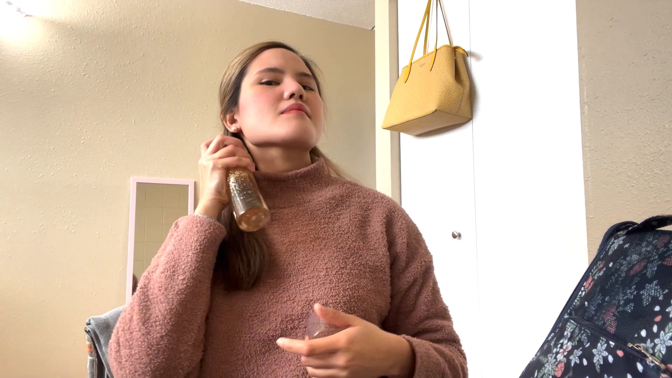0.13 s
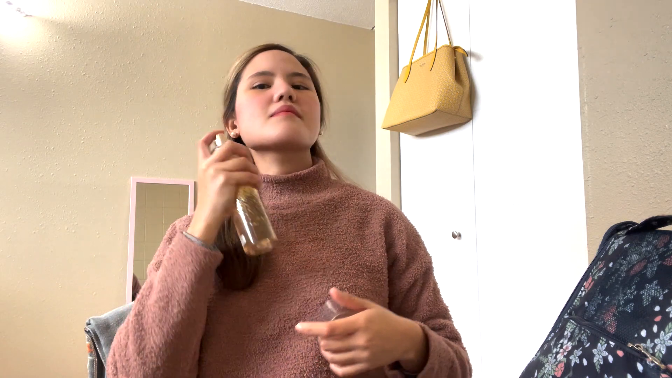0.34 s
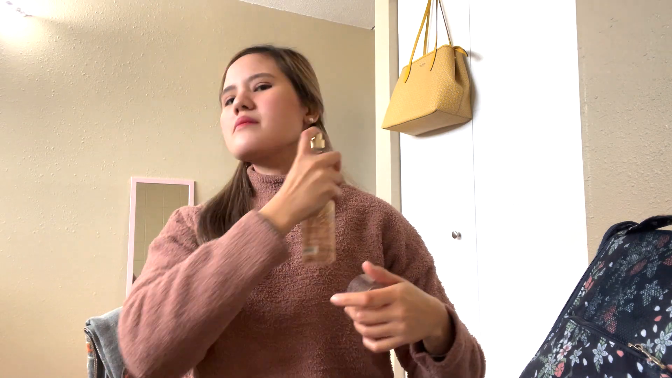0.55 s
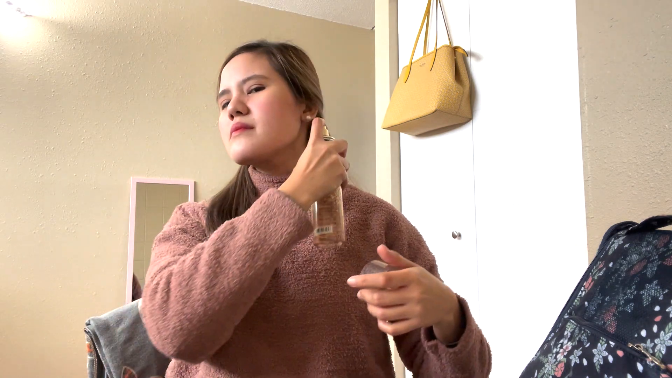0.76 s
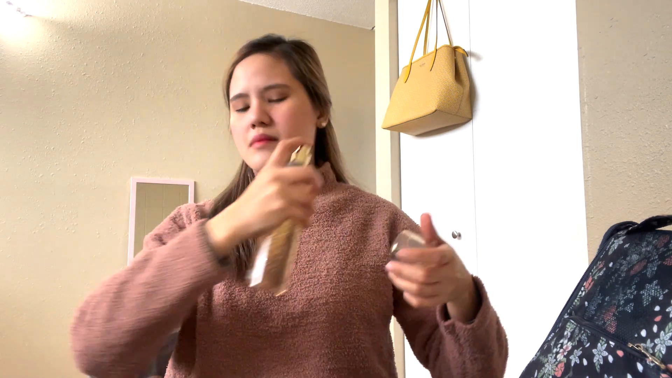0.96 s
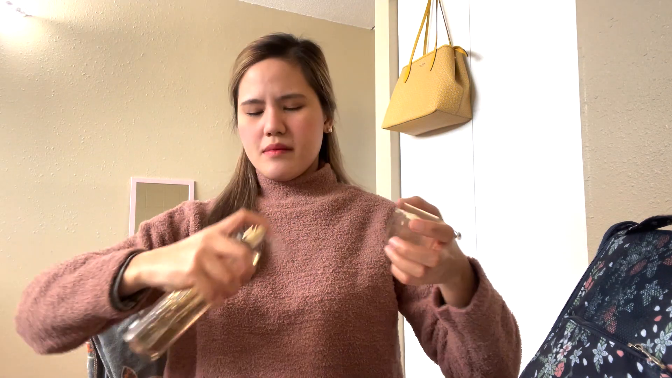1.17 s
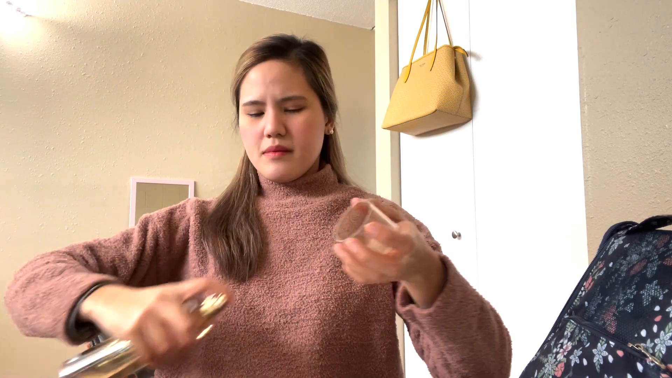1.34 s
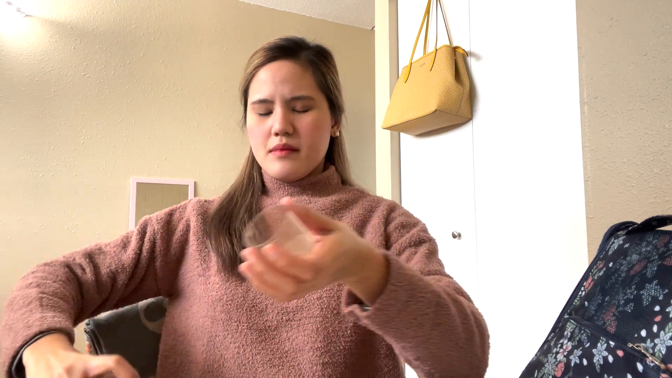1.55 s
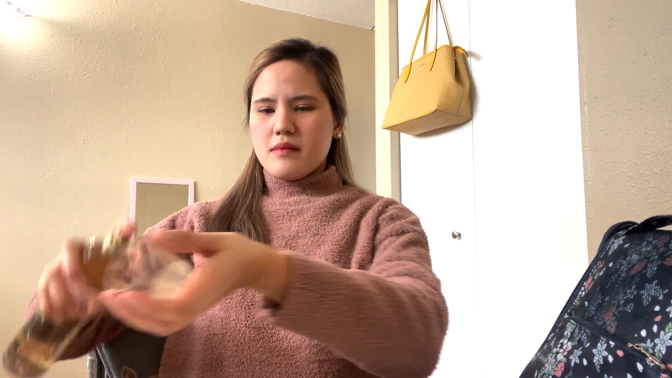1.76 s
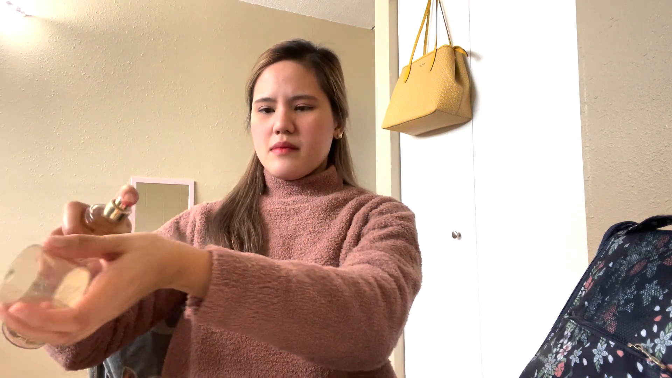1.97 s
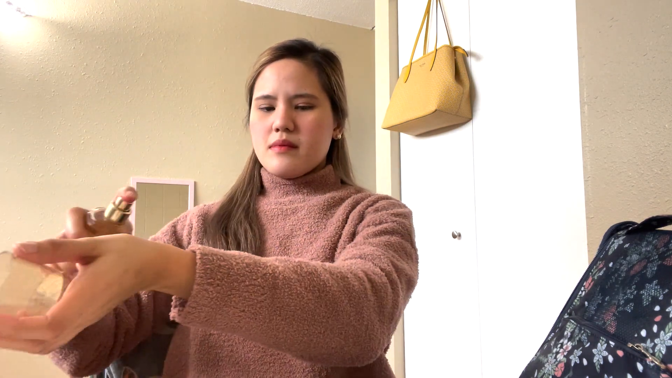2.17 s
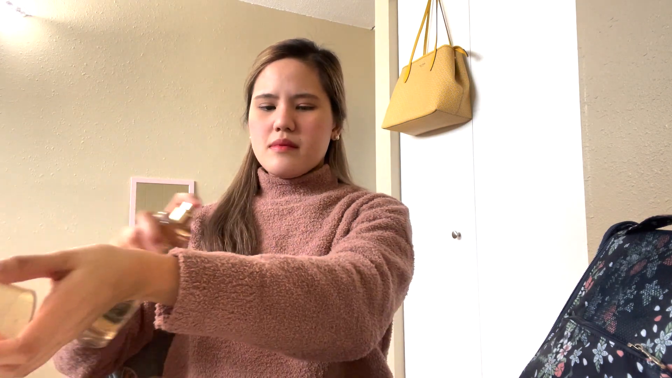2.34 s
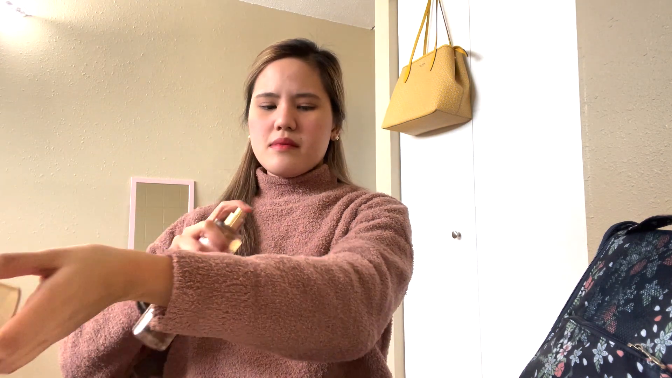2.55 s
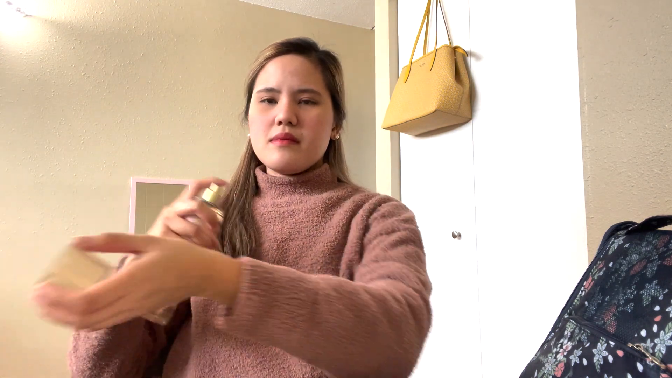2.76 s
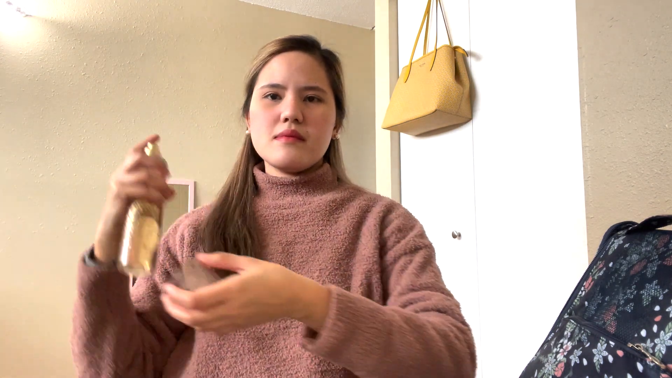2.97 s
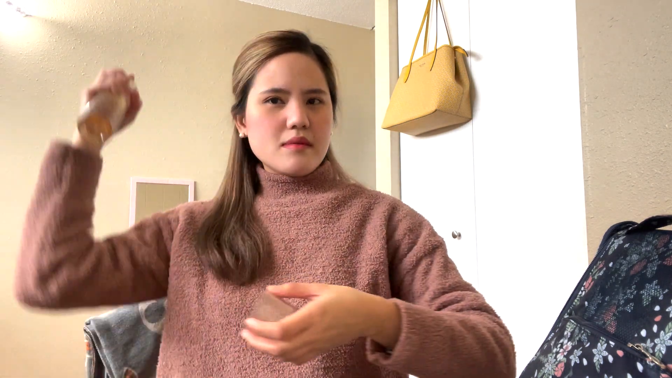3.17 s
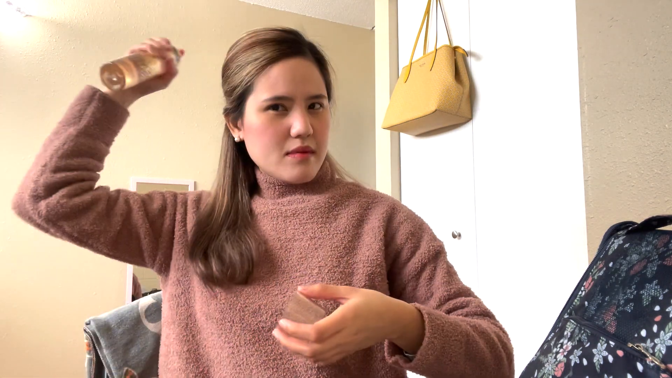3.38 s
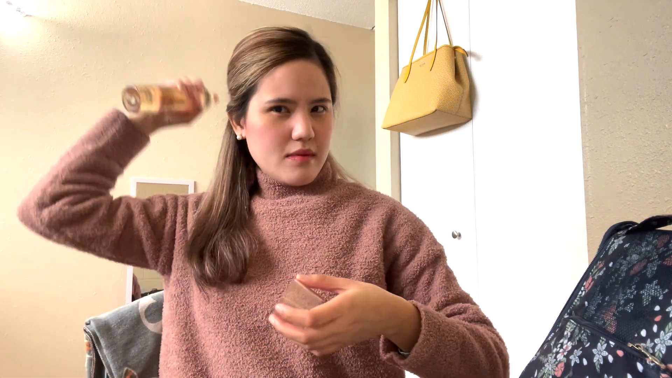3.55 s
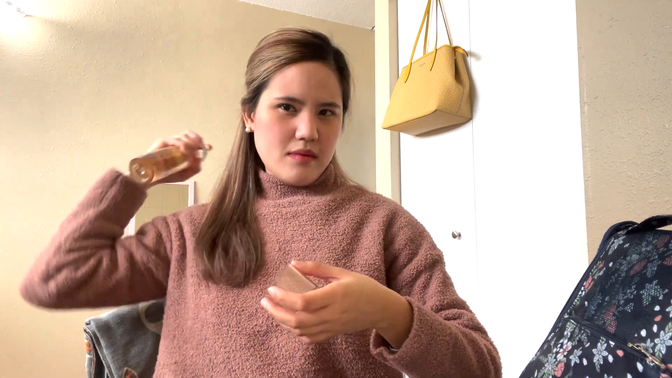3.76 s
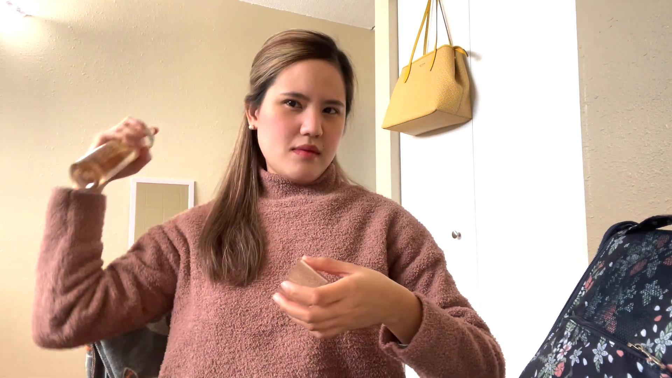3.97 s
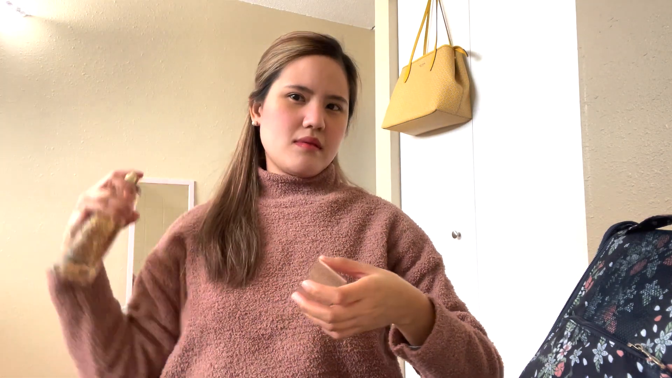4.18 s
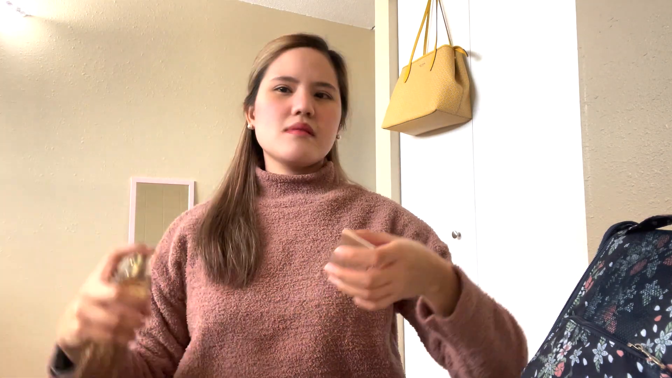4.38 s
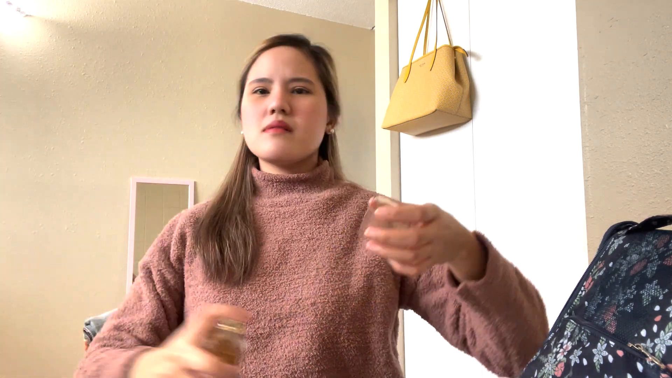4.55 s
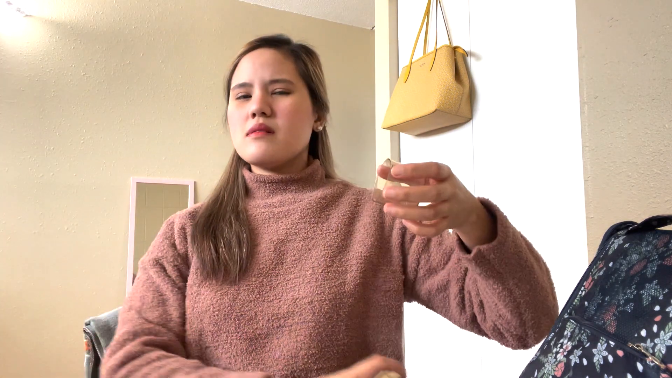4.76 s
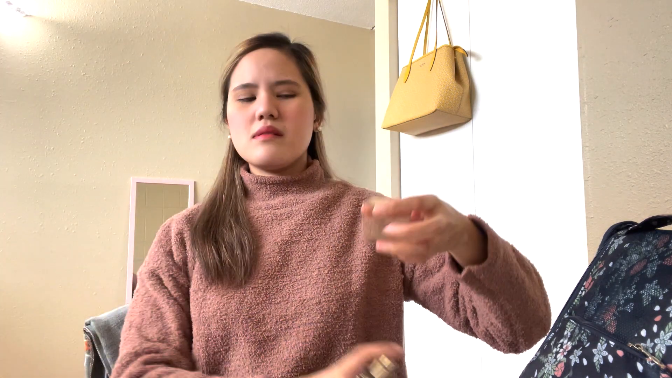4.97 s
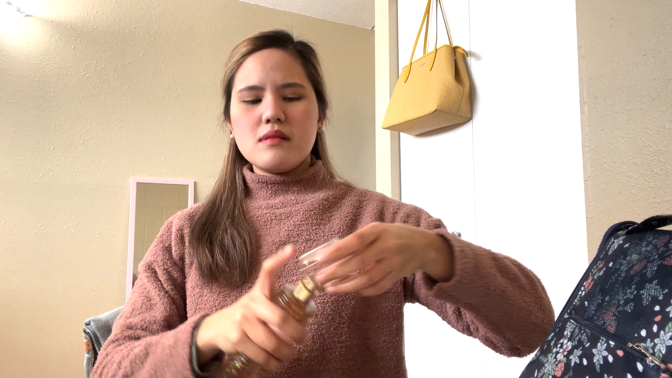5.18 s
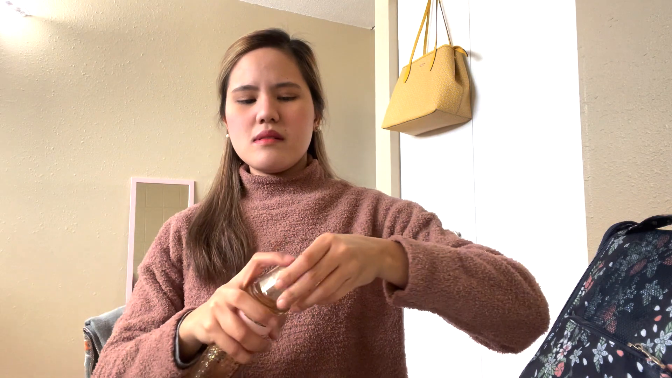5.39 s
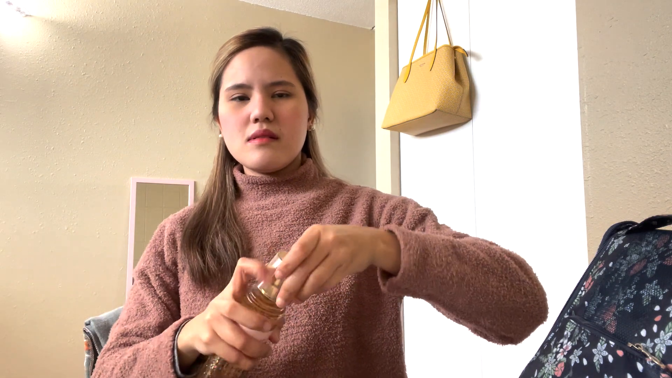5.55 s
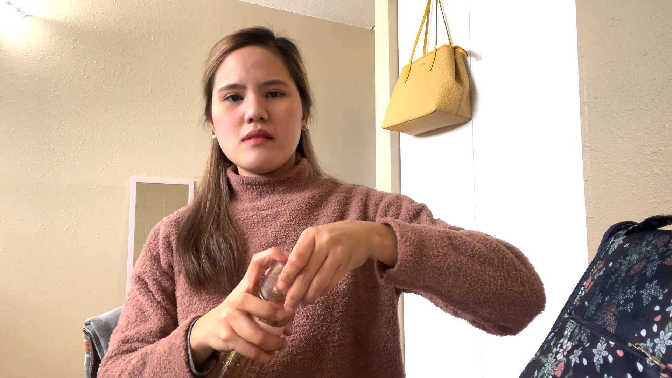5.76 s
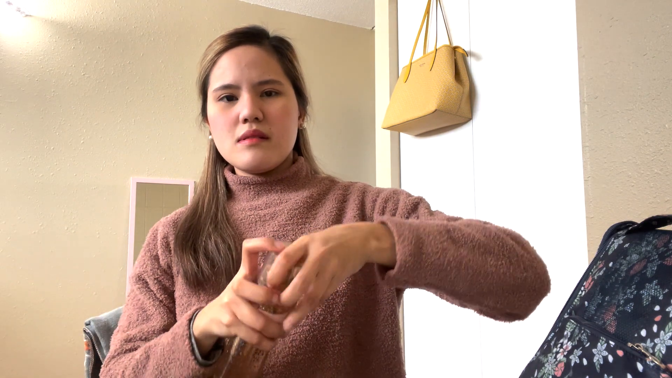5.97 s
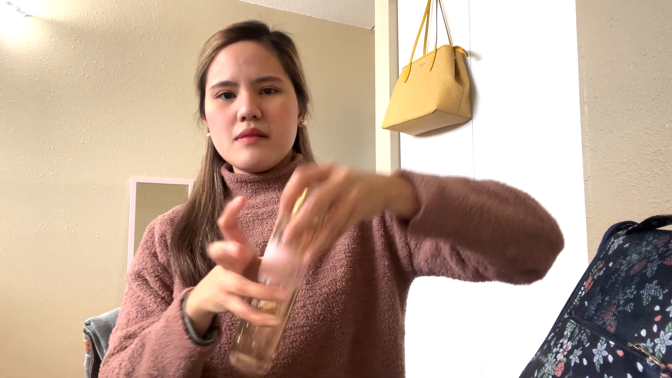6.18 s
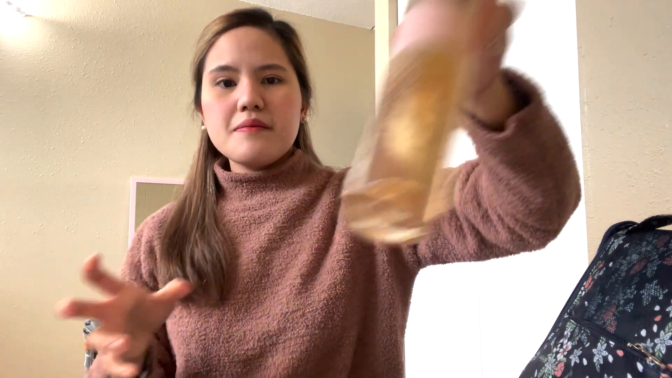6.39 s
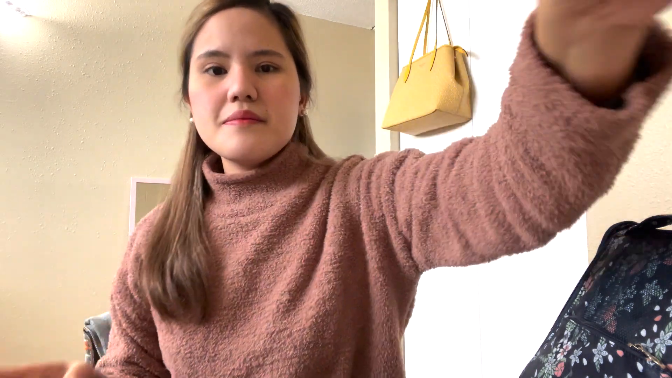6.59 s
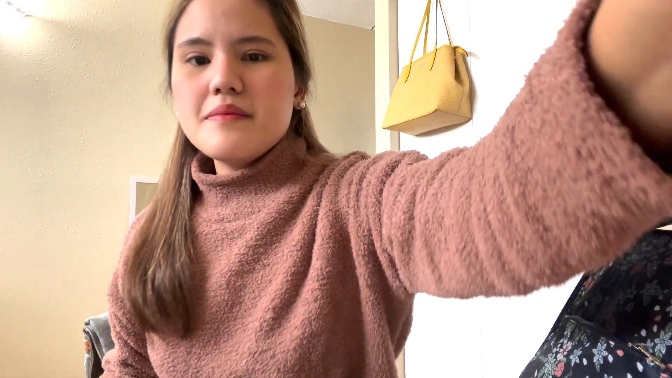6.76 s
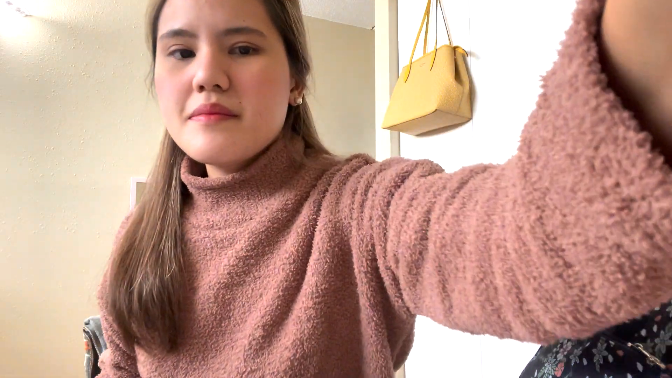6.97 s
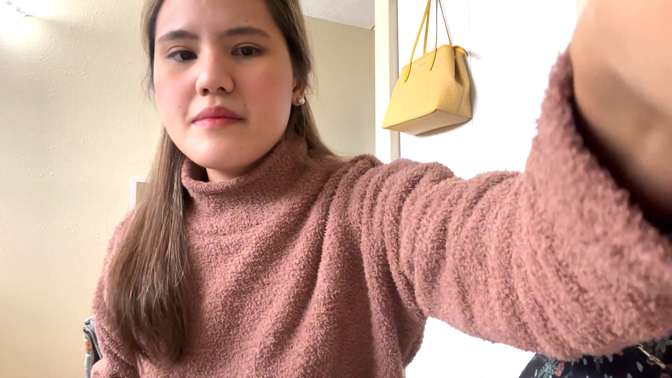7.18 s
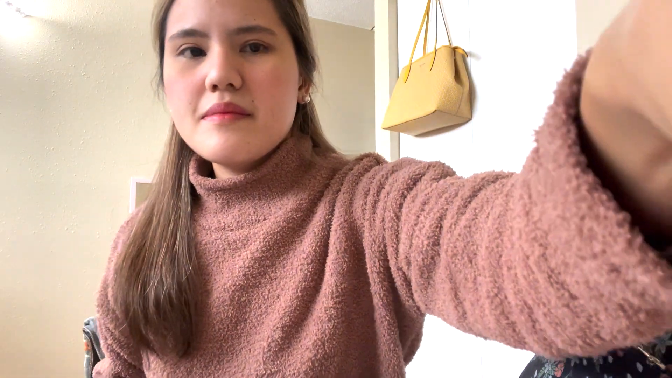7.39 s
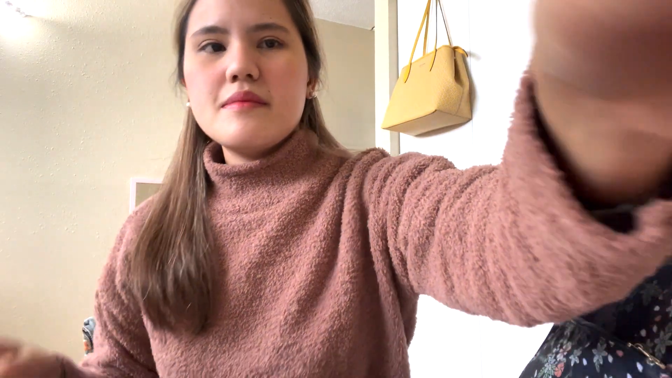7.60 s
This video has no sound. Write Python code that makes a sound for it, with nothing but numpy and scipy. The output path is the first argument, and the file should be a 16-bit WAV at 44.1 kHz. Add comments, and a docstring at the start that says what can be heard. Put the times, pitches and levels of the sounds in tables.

```python
"""A spray pump at arm's length clicks and hisses, press after press, over a low hum in a small quiet room.
Then its plastic cap is pushed on and the bottle is put down on the desk that carries the microphone.
Sprays are shaped noise with a breathy whistle; blows and clinks are decaying partials; rubs are swelling
noise. The hum is noise lifted by room resonances; two facing walls give sharp sounds a flutter echo."""
import sys
import numpy as np
from scipy import signal
from scipy.fft import rfft, irfft
from scipy.io import wavfile
from scipy.ndimage import uniform_filter1d

SR = 44100
rng = np.random.default_rng(int(sys.argv[2]) if len(sys.argv) > 2 else 0)


def store_wav(level_fs):
    """Save 16-bit WAV to argv[1]."""
    pcm = np.round(np.clip(np.atleast_2d(level_fs), -1, 1) * 32767)
    wavfile.write(sys.argv[1], SR, pcm.T.astype(np.int16))


def to_linear_factor(level_db):
    """Convert decibel levels (scalar or array-like) to linear amplitude factors."""
    exponent = np.asarray(level_db, float) / 20
    return 10 ** exponent


N = 336483


def read(points, hz):
    """A table joined by straight lines over log frequency."""
    f, value = np.transpose(points)
    return np.interp(np.log(hz + 1), np.log(f + 1), value)


def evened(x):
    """Scaled to rms 1."""
    return x / np.sqrt(np.mean(x ** 2) + 1e-20)


def add(mix, start_s, sound):
    """Mixes a sound in at a time."""
    part = mix[round(start_s * SR):][:len(sound)]
    part += sound[:len(part)]


def coloured(x, spectrum):
    """Filters by a spectrum table."""
    hz = np.fft.rfftfreq(len(x), 1 / SR)
    return irfft(rfft(x) * to_linear_factor(read(spectrum, hz)), len(x))


def resonate(x, hz, width_hz):
    """A resonance of gain 1 that follows the curve hz: shifts it to zero, smooths, shifts back."""
    turn = np.exp(2j * np.pi * np.cumsum(hz) / SR)
    r = np.exp(-np.pi * width_hz / SR)
    return 2 * (turn * signal.lfilter([1 - r], [1, -r], x / turn)).real


def swell(start_s, rise_s, level_db, fade_db_per_s):
    """Gain over the whole scene of a rub that swells by 22.5 dB to its peak and then fades."""
    t = np.arange(N) / SR - start_s - rise_s
    shape_db = np.where(t < 0, 22.5 * t / rise_s, -fade_db_per_s * t)
    return (t > -rise_s) * to_linear_factor(level_db + shape_db)


# Diffuse sound at the two ports: frequency_hz [Hz], left-right likeness [0 to 1]
LIKENESS = [(60, 0.87), (300, 0.73), (700, 0.082), (3000, 0.5), (7000, 0.057), (11000, 0.74), (15000, 0.34)]


def diffuse(z):
    """Two ports from two unrelated spectra (2 x bins x frames): alike by frequency."""
    same = np.clip(read(LIKENESS, np.linspace(0, SR / 2, z.shape[1])), 0, 1)[:, None]
    return np.array([z[0], same * z[0] + np.sqrt(1 - same ** 2) * z[1]])


# Decay of the small room: frequency_hz [Hz], t60_s [s]
ROOM_DECAY = [(120, 0.34), (400, 0.35), (1200, 0.43), (3000, 0.46), (6000, 0.39), (9000, 0.32),
              (15000, 0.32)]
# Soft furnishings swallow treble at the first bounce: frequency_hz [Hz], level_db [relative dB]
FIRST_BOUNCE = [(200, 0), (1500, -9), (4000, -11.5), (9000, -13), (15000, -14)]


def room(x, wet_db, build_s, left_db=0., left_late_s=0.):
    """Direct sound, flutter between two walls, and a tail of sparse taps dying band by band."""
    taps = np.zeros((2, 32000))
    at = np.arange(60, 31900, 16) + rng.integers(0, 16, (2, 1990))
    np.put_along_axis(taps, at, rng.choice([-1., 1.], at.shape), 1)
    hz, t, z = signal.stft(taps, SR, nperseg=256)
    fading_db = read(FIRST_BOUNCE, hz)[:, None] - 60 * t / read(ROOM_DECAY, hz)[:, None]
    tail = signal.istft(diffuse(z) * to_linear_factor(fading_db), SR, nperseg=256)[1]
    tail *= 1 - np.exp(-np.arange(tail.shape[1]) / SR / build_s)
    tail *= to_linear_factor(wet_db) / np.linalg.norm(tail, axis=1, keepdims=True)
    flutter_s, flutter_db = .0167, -6  # wall to wall and back, change each trip
    trips = np.arange(5)  # trip 0 is the direct sound
    at = np.round(trips * flutter_s * SR).astype(int)
    tail[0, at + round(left_late_s * SR)] += to_linear_factor(trips * flutter_db + left_db)
    tail[1, at] += to_linear_factor(trips * flutter_db)
    return signal.fftconvolve(x[None], tail, axes=1)[:, :N]


# Air noise of the room: frequency_hz [Hz], level_db [relative dB per Hz]
AIR_NOISE = [(12, -48), (20, -22.5), (29, -26), (43, -10), (82, -9), (147, -6.5), (218, -10), (289, -27),
             (342, -29.5), (428, -29), (535, -41.5), (1140, -44), (1280, -42.5), (11100, -56), (16500, -74)]
# Room resonances, mostly low, lifting the air noise: frequency_hz [Hz], width_hz [Hz], lift_db [dB]
HUM_RESONANCES = [(55.5, 8, 9.5), (96, 6.1, 4.5), (139.56, 1.1, 15.5), (162, 1.7, 12), (210.7, 12, 8.5),
                  (258, 2, 12), (342, 56, 6.5), (1080, 450, 9.5)]


def hum():
    """Air noise through the room's resonances, drifting in patches of time and frequency."""
    frames, hz = N // 1024 + 5, np.fft.rfftfreq(4096, 1 / SR)
    a, b, c, d, patches = rng.standard_normal((frames, 2049, 5)).T
    patches = uniform_filter1d(uniform_filter1d(patches, 12, 0), 8, 1)
    patches_db = 0.15 * evened(patches)
    lift_db = sum(db / (1 + (2 * (hz - f) / width) ** 2) for f, width, db in HUM_RESONANCES)
    level_db = (read(AIR_NOISE, hz) + lift_db)[:, None] + patches_db
    z = diffuse(np.array([a + 1j * b, c + 1j * d])) * to_linear_factor(level_db)
    noise = signal.istft(z, nperseg=4096, noverlap=3072)[1][:, 2048:N + 2048]
    return to_linear_factor(-52.5) * evened(noise)


# Faint breathy squeaks of fingers sliding on glass, levels before the room:
# start_s [s], rise_s [s], level_db [dB], fade_db_per_s [dB/s], pitch_hz [Hz]
FINGER_SQUEAKS = [(2.645, 0.024, -68, 276, 2530), (2.67, 0.031, -73.5, 172, 1860),
                  (2.85, 0.02, -79.5, 120, 2540)]


def squeaks():
    """Noise through a narrow double resonance, swelling with each slide."""
    out = np.zeros(N)
    for *shape, pitch_hz in FINGER_SQUEAKS:
        pitch = np.full(N, pitch_hz)
        breath = resonate(rng.standard_normal(N), pitch, 270)
        out += swell(*shape) * evened(resonate(breath, pitch, 220))
    return out


# Sleeve rubbing as the arm reaches, levels before the room; a negative fade goes on rising:
# start_s [s], rise_s [s], level_db [dB], fade_db_per_s [dB/s]
SLEEVE_RUBS = [(6.48, 0.13, -72, 93.5), (6.685, 0.012, -59, 306.5), (6.71, 0.018, -69.5, 120),
               (7.183, 0.044, -58.5, 704), (7.30, .032, -64.5, 595), (7.34, 0.052, -67, -3)]
# Colour of the cloth: frequency_hz [Hz], level_db [relative dB per Hz]
CLOTH_COLOUR = [(180, -25), (300, -4), (502, -13.5), (692, -22.5), (1070, -13.5), (1620, -21), (2670, -18),
                (6800, -20), (14000, -49)]


def sleeve():
    """Wool fibres catching: dense grains of uneven size."""
    grains = rng.standard_normal(N) * to_linear_factor(1.8 * rng.exponential(1, N))
    return sum(swell(*row) for row in SLEEVE_RUBS) * evened(coloured(grains, CLOTH_COLOUR))


# Small single-pitched clinks and ticks of the bottle in the hand, plus two single-pitched clicks of the pump
# head near 3.1 s, levels before onset and room: # start_s [s], level_db [dB], pitch_hz [Hz], t60_s [s]
BOTTLE_CLINKS = [(.0565, -34, 3370, 0.014), (.0685, -21, 3514, 0.023), (.0690, -32, 3030, 0.011),
                 (0.071, -45, 3490, 0.0095), (3.124, -57.5, 535, 0.028), (3.154, -67, 933, 0.035),
                 (3.393, -46, 1800, 0.0047), (3.70, -43, 3460, 0.0065), (4.81, -65.5, 2050, 0.015),
                 (6.446, -59, 1825, 0.016), (7.298, -43.5, 2250, 0.0081), (7.316, -52, 1940, 0.047),
                 (2.754, -52.5, 10250, 0.0029), (2.914, -58, 9700, 0.0026), (3.492, -50, 9000, 0.004),
                 (3.492, -50, 6500, 0.0042), (3.820, -33, 6100, 0.0035), (4.428, -53, 5500, 0.0034),
                 (4.428, -40, 3670, 0.001), (4.445, -54, 4500, 0.0024), (4.486, -44.5, 3660, 0.002),
                 (4.487, -56, 11500, .002), (4.503, -69, 11000, .002), (5.425, -58, 3500, 0.0027),
                 (5.07, -62.5, 11170, 0.00205), (7.315, -58, 9100, .002)]


def clinks():
    """One decaying partial each; the shortest are mere ticks."""
    t, out = np.arange(SR // 5) / SR, np.zeros(N)
    for start_s, level_db, pitch_hz, t60_s in BOTTLE_CLINKS:
        onset = 1 - np.exp(-t * pitch_hz / 0.5)
        partial = np.sin(2 * np.pi * pitch_hz * t)
        add(out, start_s, to_linear_factor(level_db - 60 * t / t60_s) * partial * onset)
    return out


# First instant of a blow: frequency_hz [Hz], level_db [relative dB per Hz]
CRACK_COLOUR = [(35, -50), (71, -32), (120, -15), (677, -17.5), (2020, -7), (2480, -10.5), (6140, -11.5),
                (7090, -17), (9660, -15.5), (10500, -15), (13400, -19), (16500, -38), (17000, -78)]


def blows(rows, modes, rise_cycles, detune, tuning=((0, 1),)):
    """Each blow rings the modes near the pitch it favours, each detuned at random, with a brief crack."""
    hz, mode_db, t60_s = np.transpose(modes)[:, :, None]
    t, out = np.arange(SR // 4) / SR, np.zeros(N)
    draws = rng.standard_normal((len(rows), 256 + len(modes)))
    for (start_s, level_db, favoured_hz, reach_octaves, crack_db), draw in zip(rows, draws):
        f = hz * np.interp(start_s, *np.transpose(tuning)) * (1 + detune * draw[256:, None])
        reach_db = -12 * (np.log2(f / favoured_hz) / reach_octaves) ** 2
        rings = to_linear_factor(mode_db + reach_db - 60 * t / t60_s) * np.sin(2 * np.pi * f * t)
        onset = (1 - np.exp(-t * f / rise_cycles)) ** 2
        ring = (rings * onset).sum(0)
        burst = draw[:256] * np.exp(-t[:256] / .002)
        grit = rfft(np.pad(burst, (441, 1863)))  # contact falls 10 ms in
        # the crack has an even spectrum before its colour is applied
        crack = coloured(irfft(grit / abs(grit)), CRACK_COLOUR)
        crack[:430] = 0  # silence ahead of the contact
        add(out, start_s, to_linear_factor(level_db) * ring / abs(ring).max())
        add(out, start_s - .01, to_linear_factor(level_db + crack_db) * evened(crack))
    return out


# Fingers and bottle on the desk, close to the microphone, levels before the room:
# start_s [s], level_db [peak dB], favoured_hz [Hz], reach_octaves [octaves], crack_db [dB re level]
DESK_HITS = [(6.727, -37, 250, 1.33, -34.5), (6.777, -47.5, 342, 2, -48), (6.874, -42.5, 508, 1.87, -52),
             (7.199, -27, 730, 1.53, -40.5), (7.2075, -18.5, 96, 1.08, -77), (7.2495, -30, 112, 0.98, -55),
             (7.340, -44.5, 273, 0.82, -46), (7.475, -33.5, 197, 3.9, -52)]
# Desk modes before detuning: pitch_hz [Hz], level_db [relative dB], t60_s [s]
DESK_MODES = [(55, -9, 0.7), (99, 2.5, 0.14), (112, -9.5, 0.34), (218.3, -11.5, 0.25), (341, 3, 0.018),
              (573, -6, 0.022), (940, -11.5, 0.013), (1860, -3, 0.013), (2460, -8, 0.014)]


def desk_bumps():
    """The desk top rings at its modes under each touch, each mode detuned slightly at random."""
    return blows(DESK_HITS, DESK_MODES, rise_cycles=0.38, detune=0.0065)


# Cap knocking on the neck and snapping home, levels before the room:
# start_s [s], level_db [peak dB], favoured_hz [Hz], reach_octaves [octaves], crack_db [dB re level]
CAP_HITS = [(5.1365, -39, 1428, 2.3, -29), (5.1652, -11.5, 1434, 1.6, -41.5),
            (5.1680, -8.5, 1466, 0.46, -34.5), (5.1887, -14.5, 1173, 0.41, -26),
            (5.3598, -44, 2000, 3.7, -7), (5.5480, -15, 1110, 1, -34), (5.5738, -23.5, 1321, 3.2, -18),
            (5.7782, -12, 2110, 3, -11)]
# Cap modes before the pitch factor: pitch_hz [Hz], level_db [relative dB], t60_s [s]
CAP_MODES = [(375, -8, 0.043), (537, -1.5, .025), (771, -22, .012), (1112, 4, 0.016), (1260, 4, 0.009),
             (1339, 7, 0.012), (1637, -17.5, 0.012), (1800, -0.5, 0.018), (2000, -4, 0.036),
             (2159, -0.5, 0.094), (2450, -17.5, 0.0054), (2900, -24, .008), (3520, -14, .008),
             (4300, -24.5, 0.0074)]
# The cap's pitch shifts with its seating on the neck: time_s [s], pitch factor [ratio]
CAP_SEATING = [(5.13, 0.9), (5.165, 0.97), (5.19, 0.99), (5.55, .99), (5.78, 0.9)]


def cap_knocks():
    """The plastic cap rings at its modes, all retuned together by its seating."""
    return blows(CAP_HITS, CAP_MODES, rise_cycles=0.85, detune=0, tuning=CAP_SEATING)


# Pump head bottoming out and springing back, levels before the room:
# start_s [s], level_db [peak dB], favoured_hz [Hz], reach_octaves [octaves], crack_db [dB re level]
PUMP_HITS = [(0.026, -31, 568, 0.82, -26.5), (0.591, -53, 452, 1.4, -32), (0.7, -46.5, 250, 5.2, -25.5),
             (0.801, -41, 470, 3.7, -37.5), (1.101, -51.5, 338, 1.5, -22), (1.181, -48, 573, 2.4, -42),
             (1.297, -43.5, 1290, 1.4, -20), (1.873, -41, 265, 1.16, -38.5), (1.991, -42, 850, 0.98, -28),
             (2.074, -36, 940, 3.4, -46), (2.299, -51, 250, 1.2, -26), (2.404, -35, 830, 2.48, -37),
             (2.485, -40.5, 450, 4.8, -47), (2.716, -54, 269, 0.91, -38.5), (3.236, -56, 258, 1.2, -34),
             (3.33, -39, 930, 3.9, -39), (3.392, -38, 250, 8.7, -53), (3.82, -33.5, 2920, 0.4, -43),
             (4.069, -45.5, 2960, 11, -26), (4.178, -36.5, 847, 2.13, -25.5), (4.283, -41.5, 280, 4.2, -54),
             (4.525, -52, 266, 3, -31), (4.64, -36.5, 935, 2.04, -40)]
# Pump modes before detuning: pitch_hz [Hz], level_db [relative dB], t60_s [s]
PUMP_MODES = [(250, 8.5, 0.013), (594, 3.5, 0.011), (947, 12.5, 0.0061), (1365, 8, 0.0062),
              (1750, -22.5, 0.028), (2250, -2, 0.012), (2727, 5.5, 0.0061), (3150, 5, 0.0049),
              (3500, 8, 0.0043), (4500, -12, 0.0018), (5740, 0.5, 0.0028)]


def pump_clicks():
    """The pump head rings briefly at its modes, each detuned a little at random in every click."""
    return blows(PUMP_HITS, PUMP_MODES, rise_cycles=.5, detune=.02)


# Presses of the pump at arm's length, levels before jet shaping and room:
# start_s [s], stroke_s [s], jet_db [dB], air_db [nozzle air, dB re jet], first_hz [first whistle, Hz]
PRESSES = [(.03, 0.0043, -47.5, 7, 3280), (.064, 0.005, -51, -18, 3500), (0.593, 0.081, -53.5, -1.5, 2750),
           (1.103, 0.044, -54, 1, 2900), (1.303, 0.032, -64, 10.5, 3000), (1.378, 0.046, -51, -1.5, 2930),
           (1.875, 0.063, -46.5, -5, 3500), (2.301, 0.051, -49.5, -3.5, 2760),
           (3.235, 0.05, -52.5, -7, 3240), (3.521, 0.081, -51.5, -3, 2880), (4.07, 0.048, -51.5, -5, 3180),
           (4.526, 0.06, -52.5, -1.5, 3500), (6.119, 0.022, -75, 2, 2620)]
# Fine mist: frequency_hz [Hz], level_db [relative dB per Hz]
MIST_COLOUR = [(2940, -59), (5000, -8.5), (6700, -7), (7400, -21.5), (8200, -2.5), (10600, 0.5),
               (14300, -9), (16100, -10.5), (16500, -70)]
# Air in the nozzle: frequency_hz [Hz], level_db [relative dB per Hz]
NOZZLE_COLOUR = [(290, -41.5), (500, -16), (823, -17), (914, -15.5), (1580, -13), (2630, -9.5),
                 (4530, -7.5), (6130, -7), (7210, -5.5), (8000, -6), (10400, -24), (17600, -120)]


def sprays():
    """Mist hiss and nozzle air with a breathy whistle follow the finger pressure; the jet sputters a little."""
    # the jet opens weak, builds through the stroke, dies after it
    open_db, open_s, build_db_per_s, jet_fall_db_per_s = -8, 0.011, 31.5, 275.5
    # air leaves ahead of the liquid
    air_first_db, air_first_s, air_fall_db_per_s = 10.5, 0.0042, 241.5
    # the whistle settles as the nozzle fills
    whistle_end_hz, whistle_glide_s, whistle_db, whistle_width_hz = 2750, .06, 9, 280
    mist, air, sputter = rng.standard_normal((3, N))
    mist, air = evened(coloured(mist, MIST_COLOUR)), evened(coloured(air, NOZZLE_COLOUR))
    flow = to_linear_factor(2.6 * evened(uniform_filter1d(sputter, size=300)))
    out, t = np.zeros(N), np.arange(SR // 3) / SR
    for start_s, stroke_s, jet_db, air_db, first_hz in PRESSES:
        at = round(start_s * SR) + np.arange(len(t))
        after = np.maximum(t - stroke_s, 0)
        left = np.maximum(stroke_s - t, 0)
        push_db = jet_db + open_db * np.exp(-t / open_s) - build_db_per_s * left
        level = to_linear_factor(push_db) * np.minimum(1, t / 0.0011) * flow[at]
        hz = whistle_end_hz + (first_hz - whistle_end_hz) * np.exp(-t / whistle_glide_s)
        whistle = to_linear_factor(whistle_db) * resonate(air[at], hz, whistle_width_hz)
        nozzle = evened(air[at] + whistle)
        puff_db = air_db + air_first_db * np.exp(-t / air_first_s) - air_fall_db_per_s * after
        jet = mist[at] * to_linear_factor(-jet_fall_db_per_s * after)
        out[at] += level * (jet + to_linear_factor(puff_db) * nozzle)
    return out


def scene():
    """Hands and bottle sound through the room; the desk is touched on the right, close to the microphone."""
    breathy = room(sprays() + sleeve() + squeaks(), wet_db=0, build_s=0.0021) * to_linear_factor(-1.0)
    hand = room(pump_clicks() + clinks(), wet_db=.5, build_s=.004)
    # the cap is a little to the right, and drier
    cap = room(cap_knocks(), wet_db=-2.5, build_s=.006, left_db=-3)
    desk = room(desk_bumps(), wet_db=-13.5, build_s=0.001, left_db=-6.5, left_late_s=0.00032)
    return breathy + hand + cap + desk + hum()


def roll_off(x):
    """The treble ends steeply here."""
    return signal.sosfilt(signal.butter(12, 16930, fs=SR, output="sos"), x)


# Microphone on the desk, bass roll-off and a dip of the port: frequency_hz [Hz], level_db [dB]
MIC_RESPONSE = [(20, -8), (60, 0), (7000, 0), (7500, -7), (8200, 0)]


def record(dry):
    """Two microphone ports a little apart: the left hears later and is slightly louder."""
    left, right = [coloured(port, MIC_RESPONSE) for port in dry]
    lag_s = 7.5e-5
    hz = np.fft.rfftfreq(N + 1, 1 / SR)
    late = irfft(rfft(left, N + 1) * np.exp(-2j * np.pi * hz * lag_s), N + 1)[:N]
    mix = np.array([late * to_linear_factor(0.76), right])
    return roll_off(mix)


dry = scene()
out = record(dry)
store_wav(out)
```